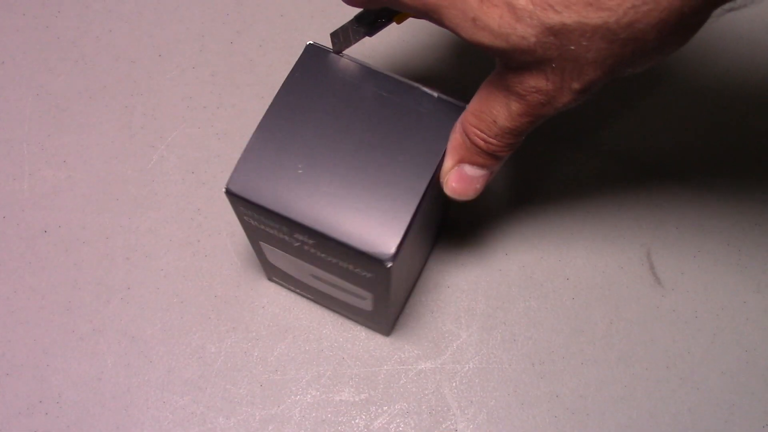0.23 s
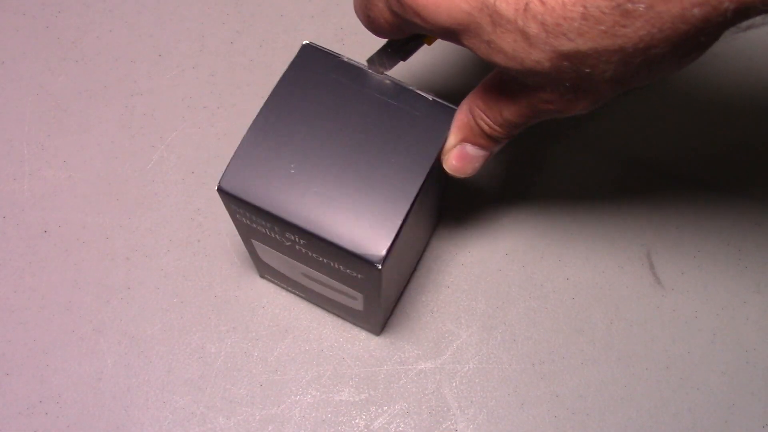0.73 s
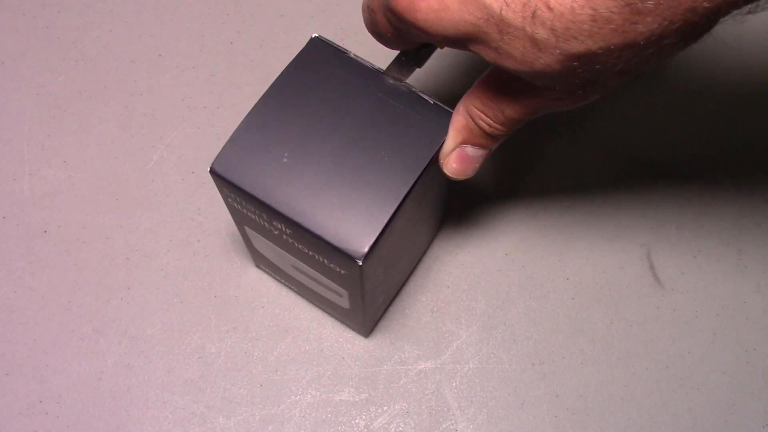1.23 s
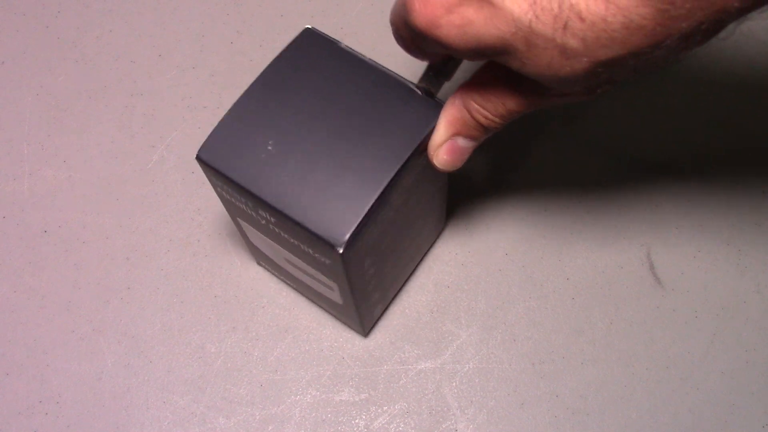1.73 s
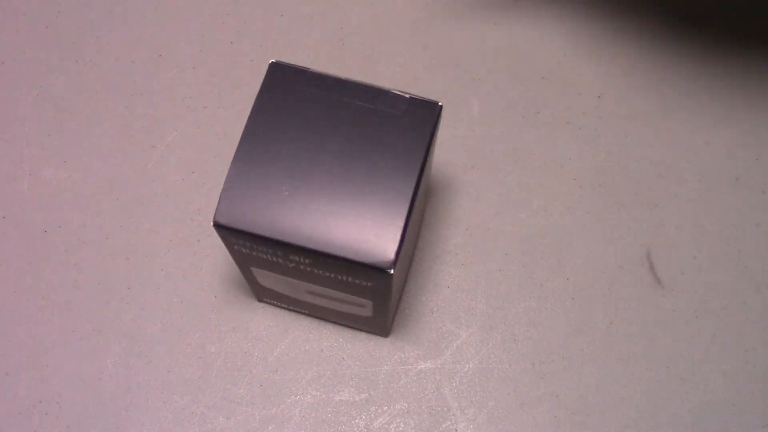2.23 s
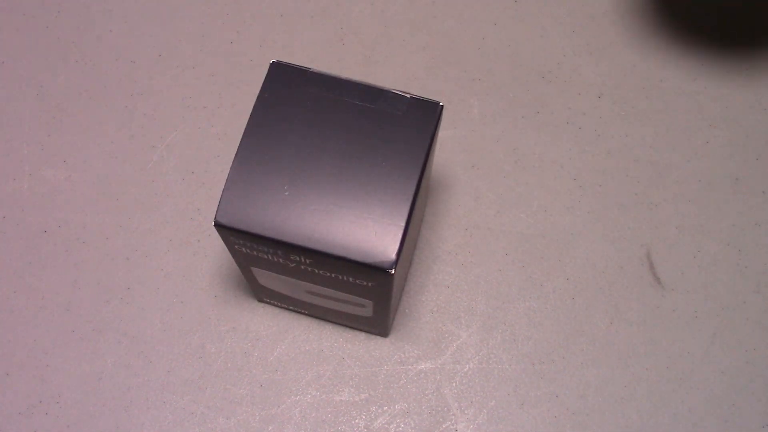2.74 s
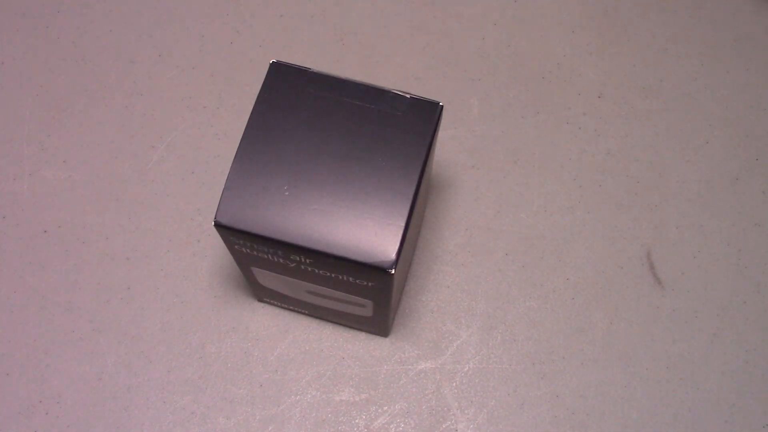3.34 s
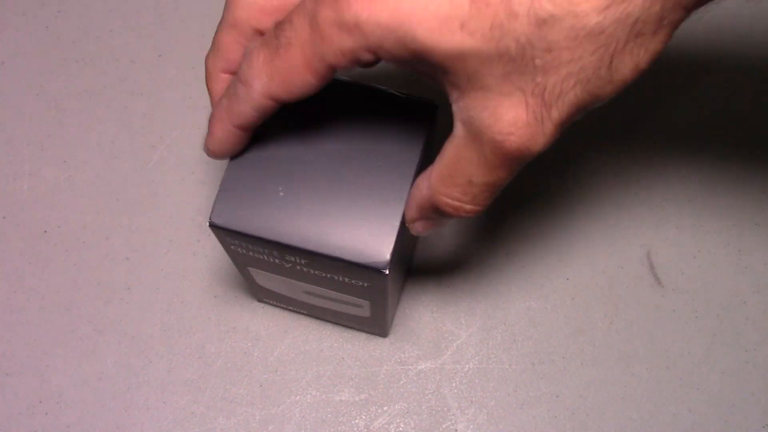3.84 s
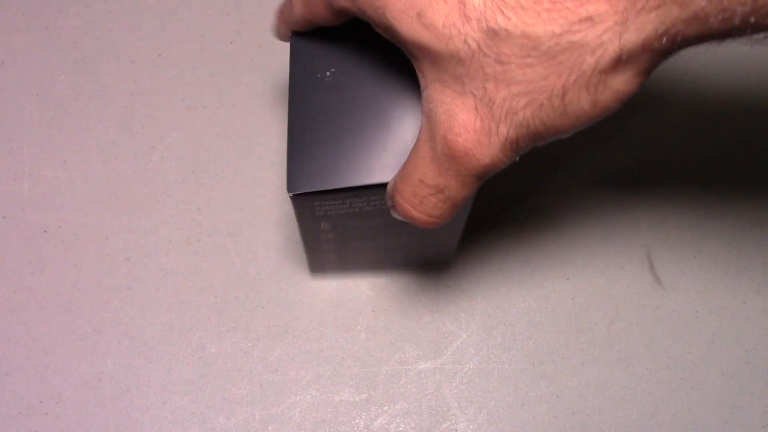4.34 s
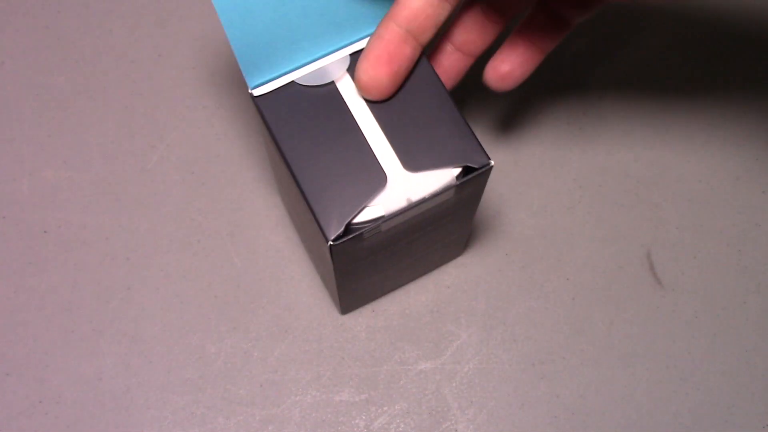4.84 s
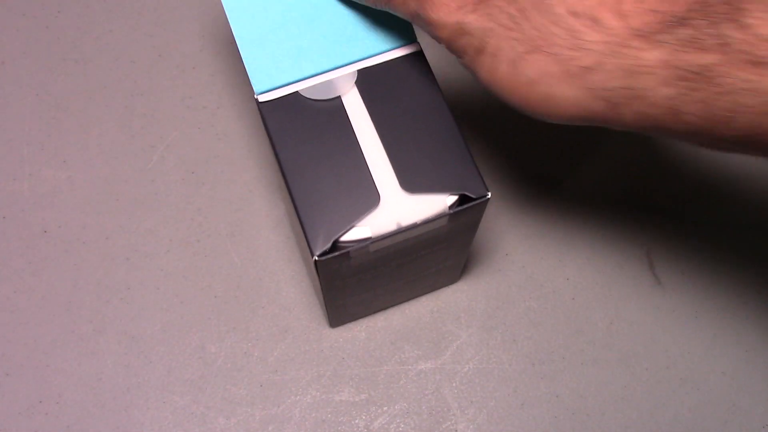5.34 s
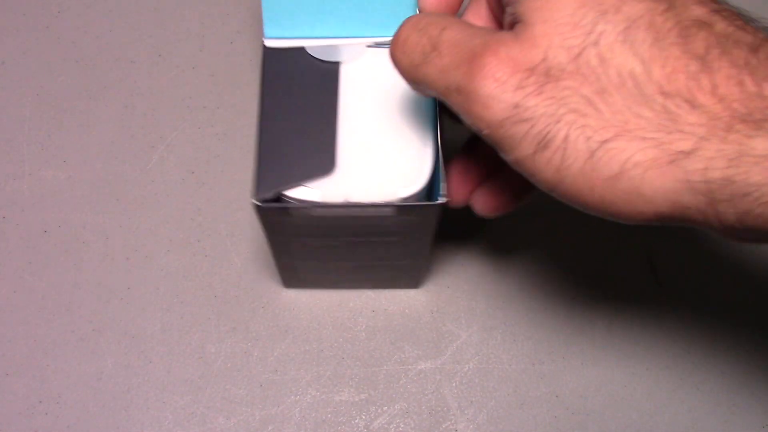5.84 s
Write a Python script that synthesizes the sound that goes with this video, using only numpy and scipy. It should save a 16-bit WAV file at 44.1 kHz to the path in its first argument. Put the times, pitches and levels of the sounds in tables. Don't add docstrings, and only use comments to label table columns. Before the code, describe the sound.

In a small bare room with faint ventilation hum, a dying tape snap gives way to soft card brushing and taps. Short hissy strokes slit a seal, then a knife slider ratchets back in bright, quickening clicks, very close. The knife clacks onto the table and bounces. Last, fingers open the box with hollow knocks, a sharp crease snap, rubbing and thin squeaks. Close microphone, lively short reverberation.

```python
import sys
import numpy as np
from scipy import signal
from scipy.fft import rfft, irfft
from scipy.io import wavfile
from scipy.ndimage import uniform_filter1d

SR = 44100
rng = np.random.default_rng(int(sys.argv[2]) if len(sys.argv) > 2 else 0)


def materialize(psi):
    bounded = np.clip(np.atleast_2d(psi).T, -1, 1)
    quanta = np.round(bounded * 32767).astype(np.int16)
    wavfile.write(sys.argv[1], SR, quanta)


def voltage_ratio(decibels):
    exponent = np.asarray(decibels, float) / 20
    return 10 ** exponent


N = 267731
TIME = np.arange(N) / SR
EVEN = 0.9


def level(x, db):
    return x * voltage_ratio(db) / np.sqrt(np.mean(x ** 2))


def peak(x, db):
    return x * voltage_ratio(db) / np.max(np.abs(x))


def add(track, s, x):
    i = int(s * SR)
    track[i:i + len(x)] += x[:N - i]


def band(x, hz, width):
    edges = np.clip([hz - width / 2, hz + width / 2], 20, 0.45 * SR)
    return signal.sosfilt(signal.butter(2, edges, "band", fs=SR, output="sos"), x)


def highpass(x, order, hz):
    return signal.sosfilt(signal.butter(order, hz, "high", fs=SR, output="sos"), x)


def colour(x, spectrum):
    hz, db = np.transpose(spectrum)
    f = np.arange(len(x) // 2 + 1) * SR / len(x) + 1
    gain = voltage_ratio(np.interp(np.log(f), np.log(hz), db))
    return irfft(rfft(x) * gain, len(x))


def decay(t, t60):
    return np.exp(-np.log(1000) * t / t60)


def ring(x, hz, t60):
    r, w = decay(1 / SR, t60), 2 * np.pi * hz / SR
    return signal.lfilter([0, np.sin(w)], [1, -2 * r * np.cos(w), r * r], x)


def soft_ring(x, hz, t60):
    return ring(ring(x, hz, t60), hz, t60)


def modes(x, table):
    return sum(voltage_ratio(db) * ring(x, hz, t60) for hz, db, t60 in table)


def walk(rate):
    k = int(SR / rate)
    held = np.repeat(rng.standard_normal(N // k + 1), k)
    return 1.7 * uniform_filter1d(held, k)[:N]


def burst(noise, length, rise=0.00072):
    t = np.arange(len(noise)) / SR
    swell = 1 - np.exp(-t / max(rise, 1e-5))
    return noise * np.abs(noise) ** 0.5 * swell * np.exp(-t / max(length, 1e-4))


def even(x, depth):
    f = rfft(x)
    flat = irfft(f / (np.abs(f) + 1e-9) ** np.clip(depth, 0, 1), len(x))
    return flat * np.hanning(2 * len(x))[len(x):] ** 4


# (frequency [Hz], level [dB per Hz])
SNAP_TAIL = [(120, -54), (200, -32), (623, -20), (836, -14.5), (1500, -7.5), (3070, -8), (3490, -5.5),
             (5730, -9.5), (8420, -8.5), (16000, -40)]


def earlier():
    return level(colour(rng.standard_normal(N), SNAP_TAIL), -33) * decay(TIME, 0.41)


# (frequency [Hz], level [dB per Hz])
HUM = [(14, -24.5), (25, 3.5), (38, 3.5), (52, 6.5), (70, -4), (100, -6), (130, -3.5), (200, -7.5),
       (255, -3), (320, -11.5), (400, -21), (600, -36)]
# (frequency [Hz], level [dB per Hz])
HISS = [(240, -7.5), (400, -0.5), (570, -2.5), (879, -3.5), (1090, -7.5), (1330, -8), (1760, -14),
        (2090, -14), (2710, -18), (4310, -17), (4730, -17.5), (8500, -16), (16000, -32)]


def hum():
    rumble = level(colour(rng.standard_normal(N), HUM), -54.5) * voltage_ratio(0.7 * walk(3))
    hiss = level(colour(rng.standard_normal(N), HISS), -57) * voltage_ratio(0.8 * walk(3.4))
    return rumble + hiss


# (delay [s], level [dB], treble lift [0-1])
ECHOES = [(.0018, -17, 0.5), (.0056, -12, 0), (.0087, -15, 0.8), (0.0117, -11, 0.8)]
# (frequency [Hz], decay t60 [s])
ROOM_T60 = [(125, 0.11), (250, 0.38), (500, 0.34), (1000, 0.4), (2000, 0.43), (4000, 0.39), (8000, 0.38),
            (14000, 0.25)]


def room(x, tail_db):
    t = np.arange(int(0.7 * SR)) / SR
    tail = sum(band(rng.standard_normal(len(t)), hz, 0.63 * hz) * decay(t, t60) for hz, t60 in ROOM_T60)
    power = np.abs(rfft(tail)) ** 2
    smooth = np.sqrt(uniform_filter1d(power, size=300) / uniform_filter1d(power, size=18))
    tail = irfft(rfft(tail) * smooth, len(t))
    tail = tail * (1 - np.exp(-(t / 0.0017) ** 2)) * np.interp(t, [0.4, 0.55], [1, 0])
    tail = tail * voltage_ratio(tail_db) / np.sqrt(np.sum(tail ** 2))
    for s, db, lift in ECHOES:
        add(tail, s, voltage_ratio(db) * np.array([-lift / 2, 1, -lift / 2]))
    return x + signal.fftconvolve(x, tail)[:N]


# (start [s], length [s], level [dB], hiss over body [dB])
DRAGS = [(0.223, 0.15, -57.5, 2), (0.457, 0.072, -47, 5), (0.99, 0.095, -66, 20.5),
         (1.368, 0.074, -59, -27), (1.782, 0.2, -50.5, -3), (2.18, 0.21, -63, 15), (3.06, 0.17, -57.5, 3),
         (3.213, 0.029, -57, 23), (3.837, 0.07, -51.5, -19.5), (4.147, 0.12, -45, -4),
         (4.333, 0.14, -44, -1.5), (4.537, 0.19, -55.5, 17), (4.68, 0.029, -50, -14),
         (4.765, 0.26, -52.5, 3), (5.01, 0.03, -54, 0), (5.095, 0.025, -61, 5), (5.176, 0.13, -61, -3),
         (5.596, 0.12, -50.5, 0), (5.735, 0.056, -49.5, -2), (5.872, 0.075, -49.5, -8)]
# (frequency [Hz], width [Hz])
RUB_BANDS = [(650, 900), (2200, 2420), (8000, 3900)]


def rubbing():
    s, length, db, tilt_db = np.transpose(DRAGS)[:, :, None]
    attack_s, release_s, wall_db = 0.033, 0.073, 0.5
    shape = np.clip((TIME - s) / attack_s, 0, 1)
    shape = shape * np.exp(-np.maximum(TIME - s - length, 0) / release_s)
    spurts, out = walk(35), 0
    for (hz, width), share_db in zip(RUB_BANDS, (-tilt_db / 2, wall_db, tilt_db / 2)):
        grains = rng.standard_normal(N) * voltage_ratio(3 * np.minimum(rng.exponential(size=N), 5))
        pressure = np.sum(voltage_ratio(db + share_db) * shape, axis=0) * voltage_ratio(1.4 * spurts + 0.56 * walk(60))
        out = out + pressure * level(band(grains, hz, width), -12.0)
    return out


# (time [s], wall
# peak [dB], wall note [Hz], crackle re wall [dB])
FLAPS = [(0.3446, -33.5, 1500, -5), (0.6214, -35.5, 1350, -4), (2.017, -46.5, 1370, 9),
         (2.2855, -51, 1170, 5.5), (3.103, -39.5, 1190, -31.5), (3.125, -41, 1000, -18),
         (3.256, -34, 1500, -20), (3.2697, -41, 2080, -25), (4.2114, -27.5, 1790, -4),
         (4.4294, -30, 1500, -10), (4.4544, -50, 1560, -10), (4.536, -33.5, 1900, -11),
         (4.556, -35.5, 2380, -16), (5.0684, -28, 1380, -50), (5.1048, -39, 1084, -11.5),
         (5.5984, -32, 2700, -9.5), (5.7174, -25, 1354, -16), (5.749, -39, 1040, -2),
         (5.931, -27, 970, -11.5)]
KNOCKS = [(0.3666, -40.5, 1410, 1), (0.4777, -31, 2000, -1.5), (0.4896, -33, 1290, -14),
          (0.5544, -44, 1440, -9), (0.6093, -32, 2500, -4), (1.792, -47, 2580, -21),
          (1.8434, -50, 1550, 11), (4.128, -40, 650, -13), (4.107, -43, 690, -20.5), (4.188, -23, 1320, -4),
          (4.1984, -26.5, 1470, 5.5), (4.3294, -39, 1190, -6), (4.4081, -23.5, 1860, -41),
          (4.572, -36.5, 2170, -15), (4.652, -35, 1470, -7), (4.664, -40, 690, -12),
          (4.6844, -49, 1720, -10), (4.7294, -44, 1900, -6), (4.807, -43, 1430, 4), (4.876, -49.5, 1770, 8),
          (5.044, -42, 1480, 1), (5.0845, -44.5, 1340, -13), (5.5853, -31.5, 2620, -5),
          (5.939, -47, 1080, -5)]
CREASES = [(0.5355, -36.5, 2930, -5), (1.7865, -42, 2160, 11.5), (2.27, -45, 2384, -26),
           (3.242, -31, 900, -24), (3.2445, -37.5, 2000, -0.5), (3.2887, -44, 890, -24),
           (4.2494, -43.5, 1170, 6), (4.4025, -14, 1680, -19.5), (4.7625, -26.5, 1710, -19),
           (4.771, -34, 2120, 5.5), (4.78, -44, 1740, 10), (5.1188, -44, 1100, 4.5),
           (5.403, -47, 1790, -17), (5.415, -35.5, 1075, -16), (5.4314, -40, 3090, -1),
           (5.7339, -26, 2960, -5)]
# (frequency [Hz], level [dB], decay t60 [s])
CAVITY = [(204.4, -5, 0.045), (420, -5, 0.042), (531, 10, 0.019), (629, 6, 0.054), (707, -2, 0.02)]


def taps():
    out = np.zeros(N)
    # rows, cavity dB re wall, contact s
    for rows, cavity_db, length in [(KNOCKS, -3, 0.004), (FLAPS, -14.5, 0.0092), (CREASES, -20, 0.0047)]:
        for (s, db, hz, crackle_db), noise in zip(rows, rng.standard_normal((len(rows), 2, 3072))):
            push = even(burst(noise[0], length), 0.63)
            wall = peak(band(push, 2300, 2000), 0.9 + 0.4 * crackle_db)
            wall = wall + peak(band(push, hz, 0.37 * hz), -4.0)
            cavity = peak(modes(push, CAVITY), cavity_db + 7.5)
            fibres = burst(noise[1], 1.1 * length, 0.0041)
            crackle = band(fibres, 6560, 6250) + 0.61 * band(fibres, 7520, 2414)
            add(out, s, voltage_ratio(db - 3.0) * (wall + cavity + peak(crackle, crackle_db + 4.0)))
    return highpass(out, 4, 200)


# (time [s], peak [dB], frequency
# [Hz], width [Hz], thump re peak [dB])
TICKS = [(2.131, -36.5, 4750, 4480, 0), (2.157, -47, 8400, 3900, 8.5), (2.197, -52, 2100, 600, -20),
         (2.2349, -25.5, 5670, 5700, -17.5), (3.483, -30, 8000, 2400, -32), (3.4883, -40, 8500, 3000, -28),
         (3.764, -15.5, 8100, 4430, -43), (3.773, -20, 8900, 5040, -32), (3.783, -22, 9000, 5000, -27),
         (3.885, -35, 2190, 1500, -24), (0.4813, -26.5, 600, 494, -10), (1.789, -24, 6600, 1800, -40),
         (1.797, -26, 9350, 1500, -40), (4.1899, -20, 820, 1190, -15), (4.4023, -14, 1540, 1280, -40),
         (4.4105, -24, 1290, 1800, -38), (4.413, -20, 1900, 1500, -38), (4.542, -30, 2200, 2200, -30),
         (4.574, -33, 2200, 1200, -30), (4.7652, -26, 1690, 700, -32), (4.772, -27, 2400, 1600, -26),
         (4.798, -33, 1500, 1200, -30), (5.4335, -38, 3200, 2000, -37), (3.7365, -29, 3770, 400, -30),
         (3.738, -25, 360, 220, -30), (3.7645, -26, 397, 322, -30), (3.246, -39, 2090, 900, -30),
         (3.2535, -36, 900, 700, -28), (4.598, -62, 300, 200, 16), (4.644, -59, 300, 200, 16),
         (4.696, -59, 300, 200, 17), (4.92, -58, 300, 200, 8)]


def ticks():
    out, kick = np.zeros(N), np.eye(1, 2048)[0]
    for s, db, hz, width, thump_db in TICKS:
        click = peak(band(kick, hz, width), db)
        thump = peak(ring(kick, 163, 0.032), db + thump_db)
        add(out, s, click + thump)
    return out


# (time [s], peak [dB], length [s])
STROKES = [(0.991, -41, 0.0074), (1.025, -43, 0.0081), (1.055, -44.5, 0.012), (1.137, -47, 0.005),
           (1.25, -47.5, 0.011), (1.26, -45, 0.0046), (1.39, -38, 0.048), (1.408, -26.5, 0.012),
           (1.419, -31, 0.01), (1.454, -31, 0.0058), (1.505, -28, 0.006), (1.58, -40.5, 0.011),
           (1.588, -43, 0.0061)]
# (frequency [Hz], width [Hz], level [dB])
TAPE = [(6480, 460, 2), (8140, 1700, -2), (11600, 1600, -10.5)]


def cutting():
    out = np.zeros(N)
    for (s, db, length), noise in zip(STROKES, rng.standard_normal((len(STROKES), 8192))):
        push = burst(noise, length, 0.0031)
        tear = peak(sum(voltage_ratio(g) * band(push, hz, width) for hz, width, g in TAPE), 0)
        wall = peak(band(push, 2280, 3360), 1)
        cavity = peak(modes(push, CAVITY), -6.5)
        add(out, s - 0.002, voltage_ratio(db - 4.5) * (tear + wall + cavity))
    return out


# (time [s], peak [dB], note
# [Hz])
POPS = [(3.106, -52, 1250), (3.118, -51, 1020), (3.132, -52, 1320), (3.239, -35.5, 1360),
        (3.247, -33.5, 2140), (3.253, -39.5, 853), (3.263, -34, 2070), (3.264, -44, 910), (3.28, -42, 2250),
        (3.293, -48, 747), (3.312, -53, 2980), (4.107, -52, 614), (4.542, -37, 1690), (4.544, -43, 3150),
        (4.552, -34.5, 1670), (4.574, -35, 1960), (4.576, -47, 3170), (4.59, -45, 1860), (4.682, -39, 1770),
        (4.705, -42, 1450), (4.7635, -26, 1740), (4.771, -31.5, 2380), (4.779, -44, 3240),
        (4.798, -37, 1400), (4.81, -51, 2400), (4.829, -55, 1750), (4.885, -42, 2960), (5.052, -49, 3100),
        (5.11, -44, 1052), (5.188, -53, 2450), (5.21, -53, 2450), (5.25, -50, 2520), (5.27, -52, 2450),
        (5.291, -53, 2740), (5.405, -50, 3170), (5.413, -48, 1780), (5.418, -44, 3140),
        (5.432, -36.5, 3160), (5.434, -48, 3700), (5.437, -43, 2470), (5.44, -50, 1780), (5.455, -49, 2500),
        (1.024, -44.5, 2080), (1.411, -35, 1445), (5.603, -31, 2350), (5.602, -34.5, 1720),
        (5.717, -45, 1320)]


def pops():
    out = np.zeros(N)
    for (s, db, hz), noise in zip(POPS, rng.standard_normal((len(POPS), 2048))):
        push = even(burst(noise, 0.0019), EVEN)
        t60 = 17 / hz
        add(out, s, peak(soft_ring(push, hz, t60), db - 1.5))
    return out


# (start [s], length [s], top pitch [Hz], bend [Hz], level [dB])
SKIDS = [(1.888, 0.11, 8760, 978, -55), (4.315, .065, 9000, 850, -55), (5.028, .12, 7540, 26, -48),
         (5.145, 0.078, 7510, 17, -61), (5.226, 0.103, 7510, 20.2, -58), (5.324, 0.12, 7500, 22, -63)]


def skids():
    out = np.zeros(N)
    for s, length, top_hz, bend_hz, db in SKIDS:
        fade = np.interp(TIME, [s, s + 0.012, s + length - 0.012, s + length], [0, 1, 1, 0])
        arch = top_hz - bend_hz * np.clip(2 * (TIME - s) / length - 1, -1, 1) ** 2
        phase = 2 * np.pi * np.cumsum(arch + 11 * walk(300)) / SR
        out = out + fade * voltage_ratio(db + 1.6 * walk(87.0)) * np.sin(phase)
    return out


# (time [s], peak [dB], tooth ring [Hz])
TEETH = [(2.384, -3, 8160), (2.396, -1, 8170), (2.4128, -5, 7610), (2.4354, -2, 8000), (2.4539, -6, 7430),
         (2.4689, -6, 7290), (2.4926, -4, 7610), (2.5087, -1, 7440), (2.5292, -1, 7460), (2.5446, .5, 7800),
         (2.5573, 0, 7670), (2.5657, .8, 8020), (2.5744, -10, 8780), (2.5767, -10, 8500),
         (2.5808, 0.8, 8000), (2.5855, 0, 7500), (2.5918, -5, 8290), (2.5944, -9, 8640), (2.5966, -9, 8640),
         (2.605, 0, 7300), (2.6091, -2, 7130), (2.6163, -7, 7870), (2.6204, -8, 8300), (2.6297, 0, 7120),
         (2.6369, -8, 8300), (2.6412, -8, 8200)]
# (frequency [Hz], level [dB], decay t60 [s])
EDGE = [(6030, -10.5, 0.0057), (12260, -1.5, 0.0015), (14970, -38.5, 0.0033)]
# (time [s], knock [dB])
GRIP = [
    (2.525, -17),
    (2.56, -30),
]
# (time [s], frequency [Hz], level [dB])
BLADE_SLIDE = [(2.4, 4550, 0.5), (2.43, 4470, 2), (2.535, 4640, -0.5), (2.545, 4040, 6), (2.59, 4220, -6.5),
               (2.607, 4630, -2), (2.63, 4150, -1)]
# (frequency [Hz], level [dB per Hz])
CHATTER = [(710, -78), (1200, -30), (1570, -34), (1850, -23), (2300, -21.5), (2900, -17), (3620, -15.5),
           (4500, -12), (5350, -12), (6500, -6.5), (7570, -8), (9200, -5.5), (10400, -15), (12600, -13),
           (15000, -23), (16000, -34)]


def ratchet():
    tooth_t60, blade_t60 = 0.0026, 0.0028
    palm = voltage_ratio(-6)
    out, kick = np.zeros((4, N)), np.eye(1, 1024)[0]
    slide_s, slide_hz, slide_db = np.transpose(BLADE_SLIDE)
    for k, ((s, db, hz), noise) in enumerate(zip(TEETH, rng.standard_normal((len(TEETH), 1024)))):
        tooth = peak(soft_ring(kick, hz, tooth_t60), 0)
        edge = sum(peak(ring(kick * np.sign(v), f, t60), g) for (f, g, t60), v in zip(EDGE, noise))
        grip_db = np.interp(s, *np.transpose(GRIP))
        handle = peak(soft_ring(kick, 1950, 0.0032), grip_db - 2.5)
        add(out[-1], s + 0.0007, (1 - palm) * handle)
        shell = peak(soft_ring(kick, 2750, 0.0016), grip_db - db + 0.5)
        blade_hz = np.interp(s, slide_s, slide_hz) * (1 + 0.0093 * noise[-1])
        blade_db = -13 - 8.5 * (hz - 7700) * 0.0014 + np.interp(s, slide_s, slide_db)
        blade = peak(soft_ring(np.roll(kick, 30), blade_hz, blade_t60), blade_db)
        chatter = peak(colour(even(burst(noise, 0.0036, 0.00037), 0.32), CHATTER), -2.5)
        click = tooth + edge + palm * voltage_ratio(-db) * handle + shell + blade + chatter
        add(out[k % 3], s + 0.0007, peak(click, db + 0.4))
    return highpass(out, 8, 1650) + voltage_ratio(-12.5) * band(out, 1150, 880)


# (time [s], peak [dB], thud re peak [dB], brightness [0-1])
DROPS = [
    (3.4938, 5.5, -31, 0.74),
    (3.503, -3.5, -36, 0.22),
    (3.7351, -13, -22, 0.24),
    (3.746, -20.5, -28, 0),
    (3.764, -18.5, -21, 0.1),
    (3.776, -37, -30, 0.1),
    (3.801, -29, -37, 0.06),
]
# (frequency [Hz], level [dB], decay t60 [s])
TABLE = [(266, 5, 0.057), (352, 3, 0.077), (480, -1, 0.045), (543, 10, 0.045), (668, -2, 0.025),
         (780, -1, 0.023), (812, -20, 0.047), (890, 5, 0.053), (1060, 1, 0.051), (2250, -6.5, 0.018)]
# (frequency [Hz], level [dB per Hz])
RATTLE = [(100, -45), (160, -31), (200, -14), (300, -5), (700, 4), (1100, 3), (1400, -4), (2200, -0.5),
          (2800, -6.5), (3800, -7), (5300, -15.5), (8300, -14.5), (11500, -21.5), (16000, -35)]


def knife_down():
    out, t = np.zeros((2, N)), TIME[:16384]
    softened = [(150, -3), (280, 7.0), (450, -2.0), (650, -12.0), (1100, -44.0), (5000, -9.5),
                (8000, 0.5), (12000, -11.5)]
    for (s, db, thud_db, bright), noise in zip(DROPS, rng.standard_normal((len(DROPS), 16384))):
        push = even(burst(noise, 0.00098, rise=0.0001), EVEN)
        top = modes(push, TABLE)
        shower = noise * (1 - np.exp(-t / 0.00051)) * np.exp(-t / 0.0071)
        sharp = colour(even(shower, EVEN), RATTLE)
        dull = colour(sharp, softened)
        share = np.clip(bright, 0, 1)
        clatter = (share * sharp + (1 - share) * dull) * np.exp(-t / 0.051)
        slow_push = uniform_filter1d(push, 200, origin=-99)
        thud = ring(push, 192.6, 0.34) + ring(slow_push, 47.3, 0.58)
        add(out[0], s, peak(top, db - 17 - 7.5 * share) + peak(clatter, db - 6.0))
        add(out[1], s, peak(thud * (1 - np.exp(-t / 0.017)), db + thud_db))
    return out


# (time [s], peak [dB])
SQUEAK = [(5.032, -32), (5.043, -31), (5.056, -38), (5.086, -38), (5.11, -43), (5.122, -43), (5.164, -52),
          (5.19, -52), (5.226, -38), (5.239, -32.5), (5.252, -45), (5.281, -42), (5.298, -46), (5.355, -42),
          (5.372, -37), (5.433, -41), (5.655, -40.5)]


def fingertip():
    out = np.zeros(N)
    for (s, db), noise in zip(SQUEAK, rng.standard_normal((len(SQUEAK), 8192))):
        push = even(burst(noise, 0.011, 0.0025), 0.64)
        hz = 7510 - 40 * (s - SQUEAK[0][0])
        tone = band(push, hz * (1 + 0.0064 * noise[-1]), 160)
        add(out, s, peak(tone + 0.095 * band(push, hz, 1300), db - 5.5))
    return out


def scene():
    box = room(taps(), -3.0) + room(pops() + fingertip(), -8.5) + room(cutting() + rubbing(), -1.1)
    box = box + skids()
    top, legs = knife_down()
    *paths, near = ratchet()
    knife = sum(room(teeth, -6.5) for teeth in paths) + near + room(top, 3.8) + legs
    return (box + knife + ticks() + earlier() + hum())[None]


def roll_off(x):
    return signal.sosfilt(signal.butter(12, 16450, fs=SR, output="sos"), x)


def record(dry):
    lowpass = signal.ellip(10, 0.2, 70, 15950, fs=SR, output="sos")
    mix = signal.sosfilt(lowpass, np.clip(dry, -1, 1))
    return roll_off(mix)


dry = scene()
out = record(dry)
materialize(out)
```